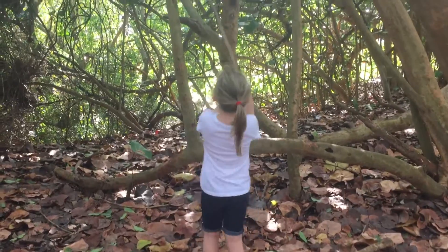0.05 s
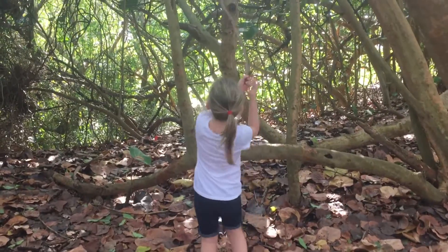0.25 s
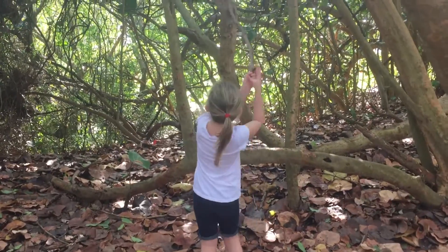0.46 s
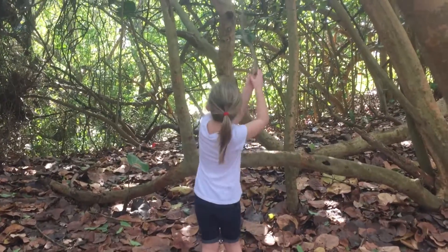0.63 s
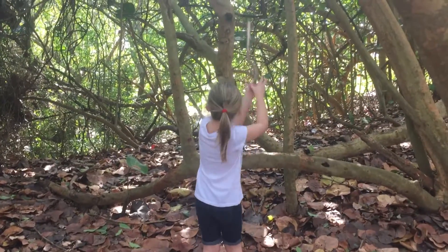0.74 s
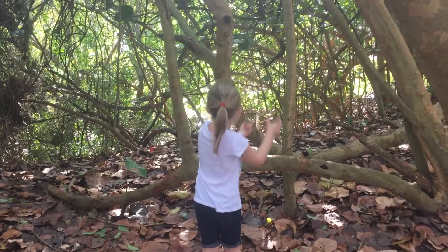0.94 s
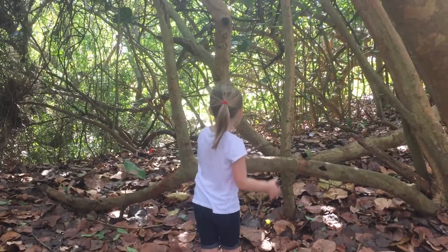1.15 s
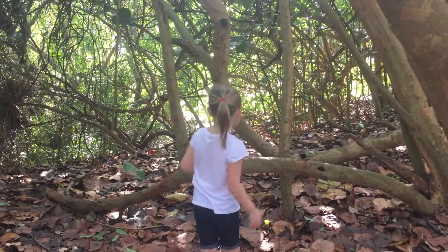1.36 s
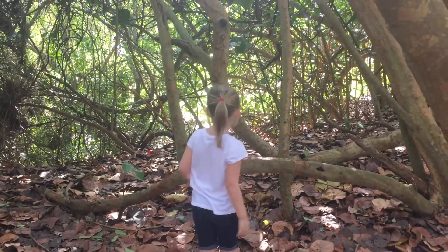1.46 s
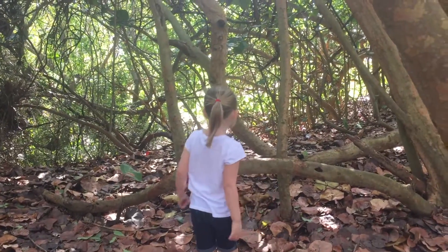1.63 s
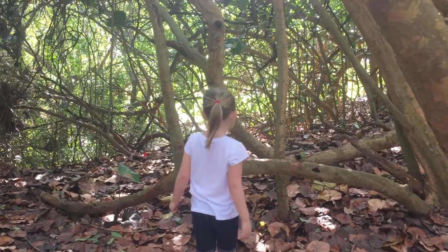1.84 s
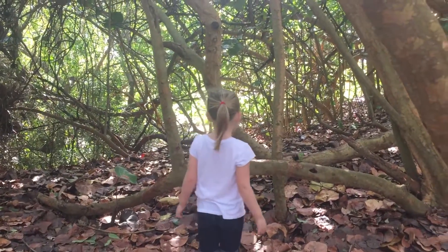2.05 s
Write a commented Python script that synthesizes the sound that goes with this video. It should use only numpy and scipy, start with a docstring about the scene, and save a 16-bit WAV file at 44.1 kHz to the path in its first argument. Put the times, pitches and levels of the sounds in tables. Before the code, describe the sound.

A thrown stick knocks sharply against a tree, then drops softly into leaves. Before and after, feet shift in dry leaves and twigs snap. Low bumps shake the hand-held microphone over faint woodland ambience.

```python
"""First comes a distant outdoor wash, with hissing foliage and feet shifting in dry leaves.
Soft low bumps shake the hand-held microphone, and twigs tick as they snap.
About a second in, a thrown stick knocks once against wood, rings briefly and drops into the leaves.
The tree trunks scatter the sounds of the stick and the leaves back as a short echo."""
import sys
import numpy as np
from scipy import signal
from scipy.fft import rfft, irfft, next_fast_len
from scipy.io import wavfile
from scipy.ndimage import map_coordinates

SR = 44100
rng = np.random.default_rng(int(sys.argv[2]) if len(sys.argv) > 2 else 0)


def bounce(signal):
    """Save signal as a 16-bit WAV file at the path given by the first command-line argument."""
    frames = np.transpose(np.atleast_2d(signal))
    limited = np.clip(frames, -1, 1)
    pcm = np.round(limited * 32767).astype(np.int16)
    wavfile.write(sys.argv[1], SR, pcm)


N = 92610
T = np.arange(N) / SR


def amp(db):
    """Turn decibels into a gain."""
    return 10 ** (np.asarray(db) / 20)


def unit(x):
    """Scale a sound to an average (rms) level of 1."""
    return x / np.sqrt(np.mean(x ** 2) + 1e-20)


def along(points, hz):
    """Read between the rows of a (frequency, value) table, on a log frequency axis."""
    freqs, values = np.transpose(points)
    return np.interp(np.log(hz + 1e-9), np.log(freqs), values)


def hump(hz, centre, octaves):
    """A bell curve of height 1 around a pitch."""
    return np.exp(-.5 * (np.log2((hz + 1) / centre) / octaves) ** 2)


def tint(x, gain_db):
    """Give x a colour (a balance of low and high) from a dB curve, at rms 1."""
    return unit(irfft(rfft(x) * amp(gain_db(np.fft.rfftfreq(N, 1 / SR))), N))


def noise(points):
    """Noise with the colour in a table, at rms 1."""
    return tint(rng.standard_normal(N), lambda hz: along(points, hz))


def envelope(start, rise, hold, t60):
    """Rise in a line; from `hold` seconds after the start, fade by 60 dB every `t60` seconds."""
    t = T - start
    return np.clip(t / rise, 0, 1) * np.exp(-np.log(1000) * np.maximum(t - hold, 0) / t60)


def burst(x, shape):
    """Shape x with an envelope, keeping just the envelope's energy."""
    return unit(x * shape) * np.sqrt(np.mean(shape ** 2))


def drifting_noise(colour, levels, waver_db, wavers_per_s):
    """Noise whose level follows a table and wavers at random."""
    waver = map_coordinates(rng.standard_normal(200), [T * wavers_per_s], mode="wrap")
    return noise(colour) * amp(np.interp(T, *np.transpose(levels)) + waver_db * waver)


# colour of the distant wash (frequency [Hz], relative level [dB])
WASH_COLOUR = [(60, -25), (200, -7), (330, -8.5), (550, -3.5), (750, -6.5), (1020, -2.5), (1250, -6.5),
               (1550, -8), (2100, -19), (3400, -27), (4400, -39.5), (8000, -43.5), (15500, -50)]
# loudness of the wash (time [s], level [dB])
WASH_LEVELS = [(0, -51.5), (.6, -51), (.9, -51.5), (1.4, -49), (1.55, -50), (1.67, -47.5), (1.85, -48.5),
               (1.97, -48), (2.1, -50)]
# colour of the low rumble (frequency [Hz], relative level [dB])
RUMBLE_COLOUR = [(20, -28), (40, -13), (70, 3), (115, -0.5), (180, -9.5), (400, -18), (2000, -52)]
# loudness of the rumble (time [s], level [dB])
RUMBLE_LEVELS = [(0, -53.5), (1.4, -50), (1.65, -57), (2.1, -53.5)]
def outdoors():
    """The far-off outdoors blurs into a soft wash over a low rumble."""
    wash = drifting_noise(WASH_COLOUR, WASH_LEVELS, waver_db=0.75, wavers_per_s=20)
    rumble = drifting_noise(RUMBLE_COLOUR, RUMBLE_LEVELS, waver_db=1.1, wavers_per_s=10.12)
    return wash + rumble


# colour of the foliage's hiss (frequency [Hz], relative level [dB])
FOLIAGE_COLOUR = [(500, -40), (1800, -7), (2700, 0), (3400, 5), (4300, -21.5), (6000, -23.5), (9000, -39),
                  (15000, -44)]
# loudness of that hiss (time [s], level [dB])
FOLIAGE_LEVELS = [(0, -52.5), (.6, -52.5), (.9, -61), (1.25, -55.5), (1.6, -58), (2.1, -62)]
def foliage():
    """The foliage gives a faint, flickering hiss."""
    return drifting_noise(FOLIAGE_COLOUR, FOLIAGE_LEVELS, waver_db=1.87, wavers_per_s=24)


# colour of dry leaves and twigs (frequency [Hz], relative level [dB])
LEAF_COLOUR = [(200, -38), (900, -7), (1800, 6), (2150, -0.5), (3400, 7), (4500, -9.5), (6200, -16),
               (8500, -30.5), (15000, -40)]
# feet shifting (time [s], rise [s], length [s], level [dB], treble lift [dB], favoured pitch [Hz])
FOOT_SHUFFLES = [(0.0, 0.0021, 0.024, -46, 2, 2530), (0.375, 0.024, 0.12, -46, 3.5, 3350),
                 (0.422, 0.025, 0.042, -41.5, -5, 2400), (0.643, 0.0034, 0.022, -42, 13, 3220),
                 (0.728, 0.0021, .01, -47.5, 6, 2950), (0.766, 0.02, 0.018, -39.5, 9.5, 3930),
                 (0.936, 0.014, 0.011, -43.5, -2, 3080), (1.08, 0.01, 0.05, -48.5, 1, 6160),
                 (1.184, 0.005, 0.022, -43.5, 0.5, 2980), (1.216, 0.0044, 0.04, -52.5, 7, 3400),
                 (1.281, 0.011, 0.065, -50, 2, 3130), (1.402, 0.01, 0.012, -54.5, 1, 3520),
                 (1.532, 0.0057, 0.0089, -55, -4, 3100), (1.752, 0.019, 0.064, -46, 1, 3260)]
def shuffles():
    """Leaves rub and crumple underfoot: many tiny crackles on a soft scrape."""
    crackles_per_s, spread_db, rub_db = 520, 2, -4.5
    focus_db = 7.5  # boost at the favoured pitch
    out = np.zeros(N)
    for start, rise, length, db, treble_db, pitch in FOOT_SHUFFLES:
        sizes = amp(spread_db * np.minimum(rng.exponential(size=N), 3))
        signs = rng.choice([-1, 1], N)
        crackles = unit(sizes * signs * (rng.random(N) < crackles_per_s / SR))
        rub = amp(rub_db) * rng.standard_normal(N)
        colour = lambda hz: (along(LEAF_COLOUR, hz)
                             + treble_db * along([(3600, 0), (6500, 0.99)], hz)
                             + focus_db * hump(hz, pitch, octaves=0.15))
        leaves = tint(crackles + rub, colour)
        out += amp(db) * burst(leaves, envelope(start, rise, length, t60=0.12))
    return out


# how long the trees echo (frequency [Hz], time to fade by 60 dB [s])
ECHO_FADES = [(200, 0.47), (1000, 0.17), (3300, 0.22), (10000, 0.15)]
def tree_echo(x):
    """Many reflections off the trees blend into a short tail; the low notes last longest."""
    hz, t, spectrum = signal.stft(rng.standard_normal(SR // 2), SR, nperseg=256)
    fade = np.exp(-np.log(1000) * t / along(ECHO_FADES, hz)[:, None])
    tail = signal.istft(spectrum * fade, SR, nperseg=256)[1]
    return signal.fftconvolve(x, tail / np.linalg.norm(tail))[:N]


# scuffs on the microphone (time [s], length [s], level [dB], pitch [Hz])
MIC_SCUFFS = [(0.222, 0.037, -37, 140), (0.255, 0.052, -45.5, 138), (0.327, 0.012, -46, 168),
              (0.489, 0.022, -39, 158), (0.614, 0.09, -48.5, 73), (0.77, 0.078, -41.5, 137),
              (0.856, 0.021, -41, 82), (0.961, 0.059, -42, 99), (1.037, 0.008, -42, 106),
              (1.106, 0.11, -47, 98), (1.311, 0.041, -47, 87)]
# colour of a scuff (frequency [multiple of its pitch], relative level [dB])
SCUFF_COLOUR = [(.2, -41), (.55, -2.5), (1, 3), (1.6, -7.5), (3, -17), (4.5, -29.5), (7, -49), (20, -65)]
# firmer jolts (time [s], level [dB], pitch [Hz])
MIC_JOLTS = [(0.228, -29, 84.6), (0.333, -28.5, 85.4), (0.517, -30, 72), (0.815, -43, 128),
             (0.867, -43, 80), (0.992, -35, 97.5), (1.174, -35.5, 94), (1.345, -37, 85.5)]
def microphone_bumps():
    """The hand shakes the microphone: short low scuffs, and a round thump at each firmer jolt."""
    out = np.zeros(N)
    for start, length, db, pitch in MIC_SCUFFS:
        scuff = tint(rng.standard_normal(N), lambda hz: along(SCUFF_COLOUR, hz / pitch))
        out += amp(db) * burst(scuff, envelope(start, rise=0.0039, hold=length, t60=0.07))
    for start, db, pitch in MIC_JOLTS:
        thump = np.sin(2 * np.pi * pitch * (T - start))
        out += amp(db) * thump * envelope(start, rise=0.006, hold=0.003, t60=0.079)
    return out


# twigs and stiff leaves breaking (time [s], level [dB], pitch [Hz], boost at that pitch [dB])
TWIG_SNAPS = [(0.2951, -39, 2480, 16), (0.3073, -38, 3170, 8), (0.4052, -35.5, 3470, 17),
              (0.4288, -40.5, 7360, 17.5), (0.457, -34.5, 2380, 11), (0.488, -33, 2930, 14),
              (0.6447, -35, 9000, 14), (0.7298, -35, 3020, 1), (0.7527, -26, 2770, 9),
              (0.769, -23, 3530, 3), (0.789, -30.5, 3940, 17), (0.946, -37, 3190, 19),
              (1.183, -37, 1510, 16), (1.189, -37.5, 3000, 7), (1.235, -46, 6400, 14),
              (1.2913, -40, 3300, 1), (1.3016, -36.5, 5700, 15.5), (1.527, -33.5, 3230, 12),
              (1.711, -36, 1530, 20.5), (1.7763, -30, 2680, 17), (1.812, -38, 3520, 2)]
def snaps():
    """Each twig breaks with a dry crack, boosted near its own pitch."""
    out = np.zeros(N)
    for start, db, pitch, focus_db in TWIG_SNAPS:
        colour = lambda hz: along(LEAF_COLOUR, hz) + focus_db * hump(hz, pitch, octaves=0.16)
        crack = tint(rng.standard_normal(N), colour)
        out += amp(db) * burst(crack, envelope(start, rise=0.0012, hold=0, t60=0.022))
    return out


# quick contacts within the one knock (time [s], level [dB], dull above [Hz])
STICK_CONTACTS = [(1.07025, -19.4, 2300), (1.07098, -15.8, 6800), (1.07302, -19.2, 2300)]
# tones the stick rings with (pitch [Hz], relative level [dB], time to fade by 60 dB [s])
STICK_TONES = [(536.8, -9.5, 0.086), (853, 5, 0.018), (997, -12.3, 0.037), (1260, -4.5, 0.019),
               (1715, 2.5, 0.024), (1813, -15.5, 0.099), (2290, -14, 0.05), (3200, -12.3, 0.013),
               (3357, -8.5, 0.019), (5480, -15.5, 0.01)]
# colour of the hardest contact's crack (frequency [Hz], relative level [dB])
CRACK_COLOUR = [(500, -16), (7000, -1), (10000, -3), (15000, -15)]
# colour of the clatter the trunks scatter back (frequency [Hz], relative level [dB])
SCATTER_COLOUR = [(150, -12), (330, -25), (470, -3.5), (600, 8), (720, -12), (970, 4), (1220, -10),
                  (1400, -2), (1850, 0), (2150, -10), (2750, -9), (3350, -4), (4500, -33), (5700, -13.5),
                  (7000, -24.5), (8500, -31.5), (15000, -47)]
# single echoes off the nearest trunks (delay [s], relative level [dB])
TRUNK_ECHOES = [(0.0133, -25), (0.0185, -18), (0.0305, -24)]
def knock():
    """Each contact sets the stick ringing, the hardest with a crack; near trunks send the blow back."""
    rise_s, low_cut_hz = 0.00092, 517
    ringing = np.zeros(N)
    for start, contact_db, dull_hz in STICK_CONTACTS:
        for hz, tone_db, t60 in STICK_TONES:
            gain = amp(contact_db + tone_db) / np.hypot(1, (hz / dull_hz) ** 3)  # softer is duller
            tone = np.sin(2 * np.pi * hz * (T - start))
            ringing += gain * tone * envelope(start, rise_s, hold=0, t60=t60)
    # a thin stick gives off little bass
    direct = signal.sosfilt(signal.butter(2, low_cut_hz, "highpass", fs=SR, output="sos"), ringing)
    hardest_s = STICK_CONTACTS[1][0]
    crack = burst(noise(CRACK_COLOUR), envelope(hardest_s, rise_s, hold=0, t60=0.016))
    scatter = burst(noise(SCATTER_COLOUR), envelope(hardest_s, rise=0.0099, hold=0, t60=0.26))
    echoes = sum(amp(db) * np.interp(T - delay, T, direct) for delay, db in TRUNK_ECHOES)
    return direct + amp(-46) * crack + echoes + amp(-31.5) * scatter


# the stick reaching the ground (time [s], level [dB])
STICK_LANDINGS = [(1.18, -38)]
# colour of its thud (frequency [Hz], relative level [dB])
THUD_COLOUR = [(100, -16), (300, -5.5), (500, -2), (750, -8.5), (1000, -6.5), (1700, -10.5), (2300, -17),
               (4500, -41), (15000, -48)]
def landing():
    """The stick lands with a dull thud, cushioned by the leaves."""
    return sum(amp(db) * burst(noise(THUD_COLOUR), envelope(start, rise=0.0013, hold=0, t60=0.17))
               for start, db in STICK_LANDINGS)


def scene():
    """Mix stick, leaves, their echo, the background and the bumps into one channel."""
    stick = knock() + landing()
    leaves = snaps() + shuffles()
    echo = tree_echo(amp(-11) * stick + amp(-8) * leaves)
    background = outdoors() + foliage()
    return (stick + leaves + echo + background + microphone_bumps())[None]


def record(dry):
    """The small microphone loses the deepest bass; the recorder cuts off the highest treble."""
    low_cut_hz, top_hz = 36, 15800
    size = next_fast_len(N + SR // 2)
    hz = np.fft.rfftfreq(size, 1 / SR)
    response = (hz < top_hz) / np.hypot(1, (low_cut_hz / (hz + 1)) ** 4)
    return irfft(rfft(dry, size) * response, size)[..., :N]


dry = scene()
out = record(dry)
bounce(out)
```